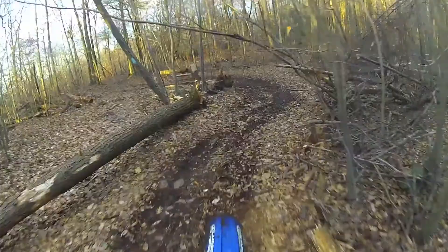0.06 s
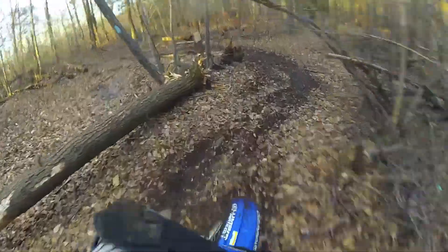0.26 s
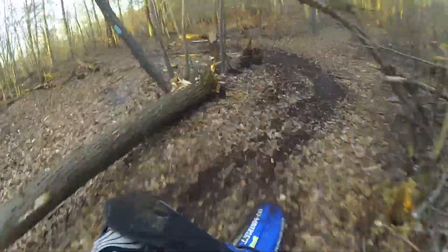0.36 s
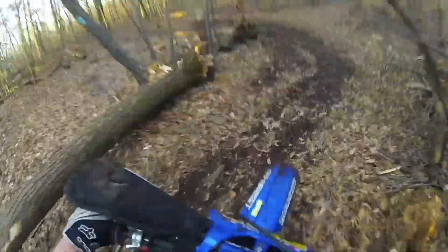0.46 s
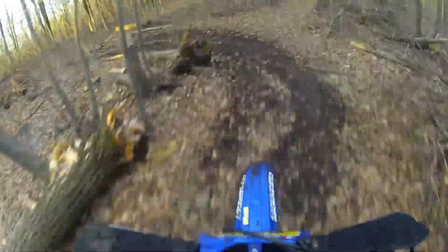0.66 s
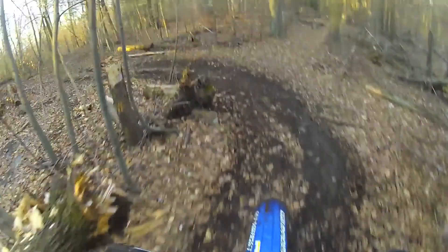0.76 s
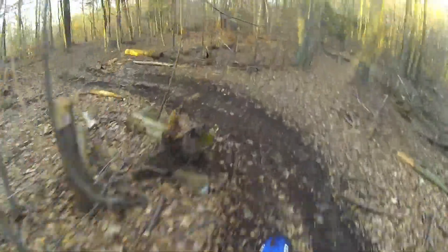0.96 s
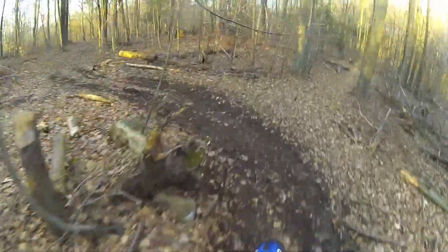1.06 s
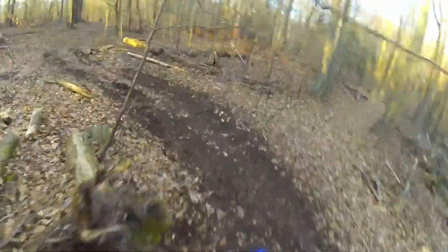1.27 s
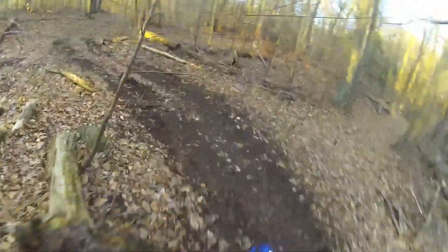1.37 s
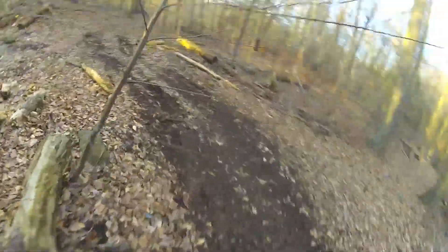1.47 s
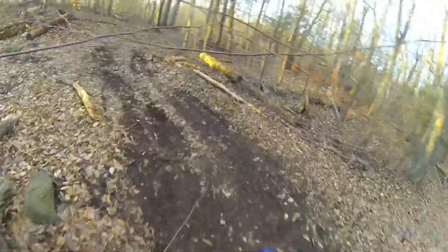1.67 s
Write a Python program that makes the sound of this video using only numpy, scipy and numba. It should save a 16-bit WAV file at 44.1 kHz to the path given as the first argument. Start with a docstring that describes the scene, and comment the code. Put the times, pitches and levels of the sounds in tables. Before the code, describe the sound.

A dirt bike engine pulls, then runs down after a sharp knock on the microphone.

```python
"""A four-stroke dirt bike on a wooded trail, heard close up from the camera on the rider's helmet.
It starts under throttle: exhaust thumps over whirring chain and gears, ticks of grit, low wind on the
microphone. Half a second in, something, perhaps a twig, hits the camera case twice, overloading it and
ducking its gain. The throttle closes, the bike rattles briefly over a bump, and the engine runs down
with softer, deeper puffs."""
import sys
import numpy as np
from scipy import signal
from scipy.fft import rfft, irfft
from scipy.io import wavfile
from numba import njit

SR = 44100
rng = np.random.default_rng(int(sys.argv[2]) if len(sys.argv) > 2 else 0)


def transcribe(signal):
    """Save signal, clipped to [-1, 1], as a 16-bit WAV file at the path in sys.argv[1]."""
    frames = np.atleast_2d(signal).T
    limited = np.clip(frames, -1, 1)
    pcm = np.round(limited * 32767).astype(np.int16)
    wavfile.write(sys.argv[1], SR, pcm)


N = 74970
TIME_S = np.arange(N) / SR
CAMERA_SR = 12000


def amp(db):
    """Decibels to gain."""
    return 10 ** (np.asarray(db) / 20)


def curve(rows):
    """Straight lines through (time_s, value) rows."""
    return np.interp(TIME_S, *np.array(rows).T)


def response(colour, size, rolloff):
    """Gain per FFT bin from (freq_hz, level_db) rows, falling away below the first row."""
    hz, db = np.array(colour).T
    freqs = np.maximum(np.fft.rfftfreq(size, 1 / SR), 1)
    return amp(np.interp(np.log(freqs), np.log(hz), db)) * np.minimum(freqs / hz[0], 1) ** rolloff


def noise(colour):
    """Coloured noise of rms 1 within the camera's band."""
    in_band = np.fft.rfftfreq(N, 1 / SR) < CAMERA_SR / 2
    y = irfft(rfft(rng.standard_normal(N)) * response(colour, N, rolloff=2) * in_band, N)
    return y / y.std()


def shaped(x, colour, size=8192):
    """Pass x through a causal, minimum-phase body of the given colour."""
    cepstrum = irfft(np.log(response(colour, size, rolloff=1)))
    fold = np.r_[1, np.full(size // 2 - 1, 2), 1, np.zeros(size // 2 - 1)]
    body = irfft(np.exp(rfft(cepstrum * fold)))
    return signal.fftconvolve(x, body)[:N]


def pulses(times, sizes):
    """Impulses at the given times."""
    y = np.zeros(N)
    at = np.round(np.asarray(times) * SR).astype(int)
    inside = (at >= 0) & (at < N)
    y[at[inside]] = sizes[inside]
    return y


def ring(x, modes):
    """Damped resonances driven by x."""
    t = TIME_S[:SR // 4]
    body = sum(amp(db - 60 * t / t60) * np.sin(2 * np.pi * hz * t) for hz, db, t60 in modes)
    return signal.fftconvolve(x, body)[:N]


def burst(start_s, decay_s):
    """Instant attack, exponential decay."""
    age = TIME_S - start_s
    return (age >= 0) * np.exp(-np.maximum(age, 0) / decay_s)


# Spectrum of the wind at the helmet: freq_hz, level_db
WIND_SPECTRUM = [(12, -13), (25, -11.5), (36, 5.5), (45, -31), (60, -16), (120, -22.5), (250, -29.5),
                 (450, -39), (900, -56)]
# Its gusts: time_s, level_db
WIND_GUSTS = [(0, -33), (.2, -34.5), (.26, -34), (.45, -35), (.65, -30), (.78, -36.5), (1.02, -31),
              (1.11, -40.5), (1.28, -30), (1.43, -33), (1.55, -29), (1.7, -35)]


def wind():
    """Moving air buffets the microphone with a low rumble."""
    return noise(WIND_SPECTRUM) * amp(curve(WIND_GUSTS))


# Grit and twigs along the trail: start_s, level_db, peak_hz
GRIT_HITS = [(.1143, -21, 4400), (.1235, -30, 4400), (.4185, -20, 4400), (.4245, -24, 4000),
             (.4632, -16, 3400)]


def grit(slope_db_per_octave=25):
    """Each small hit is a sharp tick of bright noise."""
    ticks = 0
    for start, db, hz in GRIT_HITS:
        colour = [(hz / 2, -slope_db_per_octave / 2), (hz, 0), (2 * hz, -slope_db_per_octave)]
        ticks += amp(db) * burst(start, decay_s=0.00099) * noise(colour)
    return ticks


# Spectrum of the shaken bike: freq_hz, level_db
RATTLE_SPECTRUM = [(600, -35), (1000, -19), (1260, 2.5), (1650, -25), (2100, -3), (2800, -18.5),
                   (6000, -35)]


def rattle(centre_s=0.657, width_s=0.0068, level_db=-33):
    """A bump shakes one short rattle out of the bike."""
    swell = np.exp(-0.5 * ((TIME_S - centre_s) / width_s) ** 2)
    return amp(level_db) * swell * noise(RATTLE_SPECTRUM)


def whirr(colour, firings, repeat_share=0.3, size=1024):
    """Chain and gear clatter: a share of its power repeats every engine cycle, the rest is fresh."""
    fresh = noise(colour)
    grain = noise(colour)[:size] * np.hanning(size) ** 0.5
    repeating = signal.fftconvolve(pulses(firings, np.ones(len(firings))), grain)[:N]
    return np.sqrt(repeat_share) * repeating / repeating.std() + np.sqrt(1 - repeat_share) * fresh


# Chain and gear spectra, pulling and coasting: freq_hz, level_db
PULL_SPECTRUM = [(260, 4), (450, 0.5), (535, -6.5), (665, 7), (765, -9.5), (1050, -6.5), (1320, 1),
                 (1430, -10), (1760, 0), (2010, -4), (2600, 2.5), (2930, -13.5), (3490, -7.5), (5160, -20),
                 (6000, -20.5), (7800, -63), (13200, -120)]
COAST_SPECTRUM = [(260, -2), (450, -1), (518, 2.5), (565, -51), (679, -6), (791, -6.5), (982, -11),
                  (1230, -2), (1430, -13), (1800, 4.5), (2100, -2.5), (2340, 0.5), (2970, -10.5),
                  (3420, -7), (5330, -15.5), (6000, -18.5), (7800, -60), (13200, -120)]
# Strength of each at the helmet: time_s, gain_db
PULL_GAIN = [(0, -39), (.14, -37.5), (.2, -37.5), (.27, -36.5), (.5, -35), (.57, -54.5), (.68, -48.5),
             (.85, -52), (1.7, -56.5)]
COAST_GAIN = [(0, -43), (.6, -52), (.68, -42), (1, -46), (1.4, -46.5), (1.7, -45)]
# Narrow case and engine resonances that colour the coasting whirr: pitch_hz, relative_db, t60_s
WHIRR_RESONANCES = [(1258, -2, 0.053), (1868, 0.5, 0.082), (2400, 0.5, .04), (2594, -4, 0.052)]


def drivetrain(cycles, firings, gear_order=59, gear_db=-8.5, resonance_db=-7, throb_db=2.5):
    """Below the rider, chain and gears whirr; under load a gear whines and each firing adds a ping."""
    wander = 0.12 * noise([(10, -14), (40, 9), (300, -49)])
    whine = amp(gear_db) * np.sin(2 * np.pi * gear_order * cycles + np.pi * wander)
    strikes = pulses(firings, rng.uniform(0.87, 1, len(firings)))
    ping = ring(strikes, [(2616, -3, 0.086)])  # pitch_hz, level_db, t60_s
    resonance = ring(rng.standard_normal(N), WHIRR_RESONANCES)
    pulling = whirr(PULL_SPECTRUM, firings) + whine + ping
    coasting = whirr(COAST_SPECTRUM, firings) + amp(resonance_db) * resonance / resonance.std()
    throb = amp(throb_db * np.cos(2 * np.pi * cycles))
    return throb * (pulling * amp(curve(PULL_GAIN)) + coasting * amp(curve(COAST_GAIN)))


# Contacts with the camera case: start_s, ring_db, crack_db, thud_db, contact_s
CASE_BLOWS = [(0.507, 10.5, -9, -1, 0.007), (0.5125, -6, 5, -1, 0.0013), (.5328, -11, -1.5, -38, .0015),
              (0.5373, -15, -7.5, -31, .005), (0.552, -20, -29.5, -47, 0.0053),
              (.565, -40, -36, -44, 0.0055)]
# Resonances of the case, and the low thud of the overloaded knock: pitch_hz, level_db, t60_s
CASE_RINGS = [(550, -19, 0.078), (1000, -13, 0.015), (1190, -20, 0.024), (1871, -2.5, 0.037),
              (2390, -13, 0.019), (3783, -16.5, 0.087)]
THUD_MODES = [(115, 7, .022), (270, 0, .012)]
# Spectrum of the scrape on the case: freq_hz, level_db
SCRAPE_SPECTRUM = [(150, 16), (500, -5), (1000, -0.5), (2400, -2), (4000, -9.5), (6000, -2)]


def knocks(damp_s=0.0018):
    """Blows right at the microphone, each with a low thud; the case rings and scrapes, then is damped."""
    blows = 0
    scrape = noise(SCRAPE_SPECTRUM)
    for start, ring_db, crack_db, thud_db, contact_s in CASE_BLOWS:
        blow = pulses([start], np.ones(1))
        case = amp(ring_db) * ring(blow, CASE_RINGS)
        crack = amp(crack_db) * burst(start, decay_s=0.0095) * scrape
        thud = amp(thud_db) * ring(blow, THUD_MODES)
        damping = np.exp(-np.maximum(TIME_S - start - contact_s, 0) / damp_s)
        blows += damping * (case + crack) - thud
    return blows


# Spectra of exhaust bark, overrun puff and intake gulp at the helmet: freq_hz, level_db
BARK_SPECTRUM = [(25, -7.5), (45, -15.5), (90, -4), (132, -6), (176, -19), (220, 0.5), (268, 1),
                 (310, -2.5), (355, 1), (400, -5), (450, -20), (550, -10.5), (620, -27.5), (680, -11.5),
                 (790, -27.5), (1500, -30.5), (4000, -81)]
PUFF_SPECTRUM = [(20, -14.5), (35, -3.5), (72, -7), (108, -16), (150, 1.5), (182, -3), (220, -8),
                 (260, -15.5), (400, -23.5), (600, -43), (2000, -61.5)]
GULP_SPECTRUM = [(60, -29), (180, -24.5), (250, 2), (290, 0), (325, -3.5), (362, -1), (405, -8.5),
                 (460, -32), (515, -13), (570, -35), (700, -10), (820, -38), (2000, -49.5)]
# Strength of each along the ride: time_s, gain_db
BARK_GAIN = [(0, 0.5), (.25, -1.5), (.49, 2), (.56, -23), (.68, -11), (.9, -19), (1.4, -20.5), (1.64, -26),
             (1.68, -8)]
PUFF_GAIN = [(0, 2.5), (.55, -17), (.68, 3.5), (1.05, 1), (1.3, 3), (1.7, -1)]
GULP_GAIN = [(0, -1), (.55, -4.5), (.7, 5), (1.15, 2.5), (1.35, -5), (1.7, -7)]


def engine(cycles, firings, bark_db=21, puff_db=18.5, gulp_db=5, jitter_s=0.0001):
    """Each cycle the exhaust barks and puffs, then the intake gulps; off throttle the puffs lead."""
    timing, bark_scatter, puff_scatter, gulp_scatter = rng.standard_normal((len(firings), 4)).T
    bark_times = firings + jitter_s * timing
    puff_times = bark_times + 0.0016
    gulp_times = np.interp(np.arange(len(firings)) + 0.45, cycles, TIME_S)  # 0.45 cycle after firing
    barks = pulses(bark_times, amp(bark_db + bark_scatter)) * amp(curve(BARK_GAIN))
    puffs = pulses(puff_times, amp(puff_db + 3 * puff_scatter)) * amp(curve(PUFF_GAIN))
    gulps = pulses(gulp_times, amp(gulp_db + 3 * gulp_scatter)) * amp(curve(GULP_GAIN))
    return shaped(puffs, PUFF_SPECTRUM) + shaped(gulps, GULP_SPECTRUM) - shaped(barks, BARK_SPECTRUM)


# Engine speed: time_s, firing_rate_hz
FIRING_RATE = [(0.0, 43.72), (0.14, 42.12), (0.21, 45.61), (0.27, 43.69), (0.52, 48.43), (0.65, 40.75),
               (0.8, 36.85), (1.03, 36.14), (1.35, 32.07), (1.7, 30.04)]


def engine_timing(first_firing_s=0.0103):
    """The running count of engine cycles, and the firing times, one per whole cycle."""
    cycles = np.cumsum(curve(FIRING_RATE)) / SR
    cycles -= np.interp(first_firing_s, TIME_S, cycles)
    firings = np.interp(np.arange(int(cycles[-1]) + 1), cycles, TIME_S)
    return cycles, firings


def scene():
    """Bike, wind and trail reach one helmet microphone, the same in both channels."""
    cycles, firings = engine_timing()
    bike = engine(cycles, firings) + drivetrain(cycles, firings)
    mono = bike + wind() + knocks() + grit() + rattle()
    return np.array([mono, mono])


@njit
def follow(x, attack_s, release_s):
    """Level follower with separate rise and fall times."""
    levels, level = np.empty(len(x)), 0.0
    for i in range(len(x)):
        lag_s = attack_s if abs(x[i]) > level else release_s
        level += (abs(x[i]) - level) / (SR * lag_s)
        levels[i] = level
    return levels


def record(dry, limit_db=-9.5, ceiling_db=-1.4, top_hz=15400):
    """The helmet camera: a slow limiter ducks the gain, peaks overload, and the sample rate is low."""
    level = follow(dry[0], attack_s=0.0086, release_s=0.089)
    limited = dry / np.maximum(level / amp(limit_db), 1)
    coarse = signal.resample_poly(limited, CAMERA_SR, SR, axis=1)
    overloaded = amp(ceiling_db) * np.tanh(coarse / amp(ceiling_db))
    held = np.repeat(overloaded, 8, axis=1)  # held samples mirror the sound into the treble
    mirrored = signal.resample_poly(held, SR, 8 * CAMERA_SR, axis=1)[:, :N]
    lowpass = signal.ellip(8, 0.2, 80, top_hz, fs=SR, output="sos")
    return signal.sosfilt(lowpass, mirrored)


dry = scene()
out = record(dry)
transcribe(out)
```